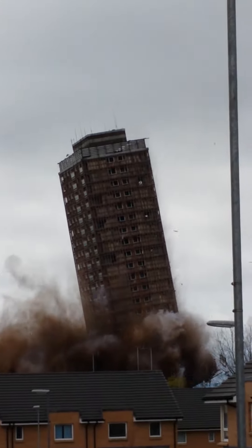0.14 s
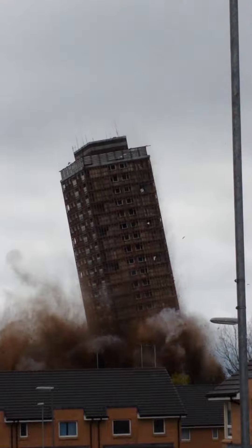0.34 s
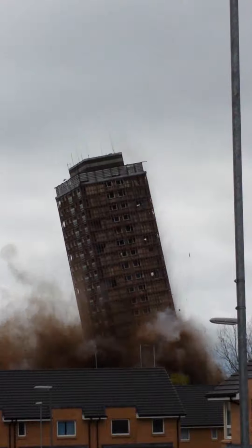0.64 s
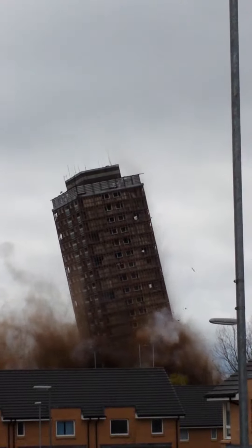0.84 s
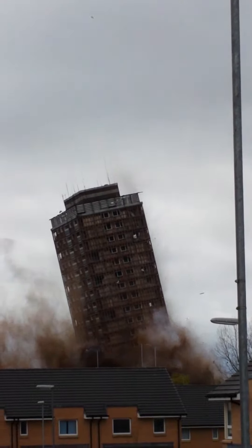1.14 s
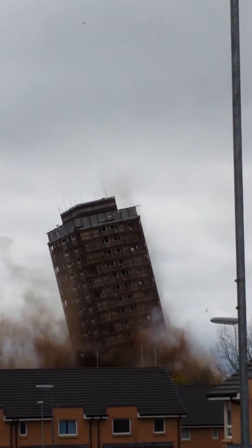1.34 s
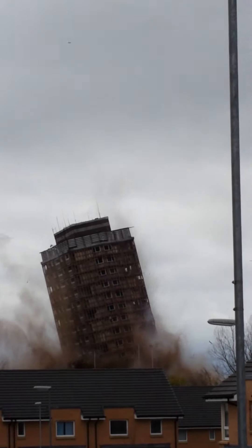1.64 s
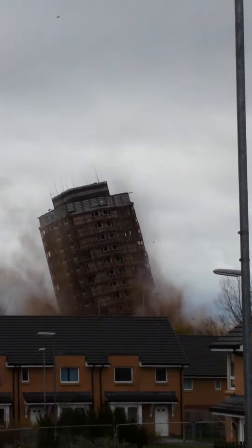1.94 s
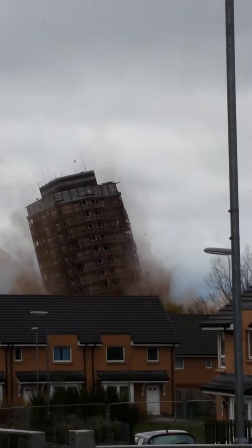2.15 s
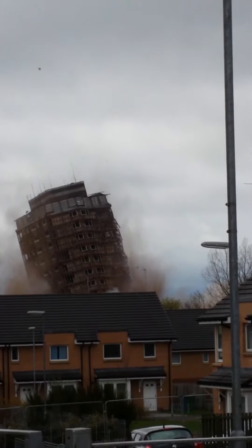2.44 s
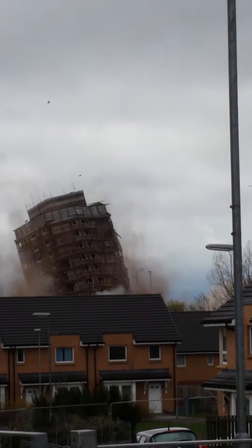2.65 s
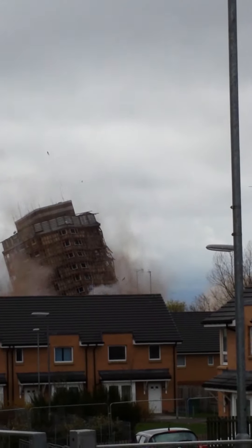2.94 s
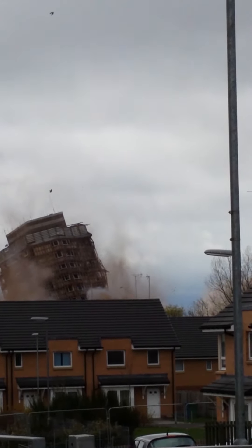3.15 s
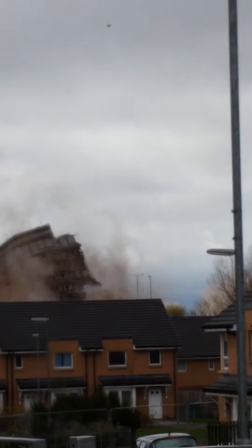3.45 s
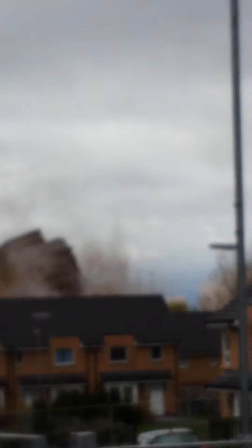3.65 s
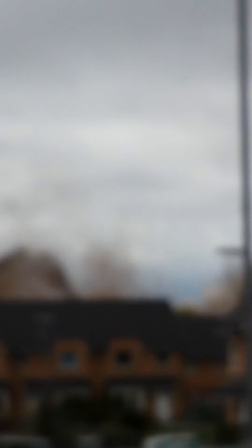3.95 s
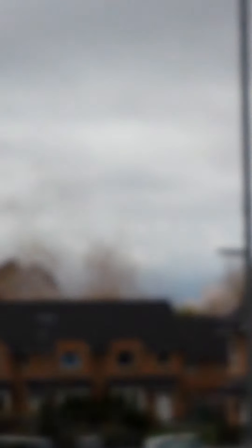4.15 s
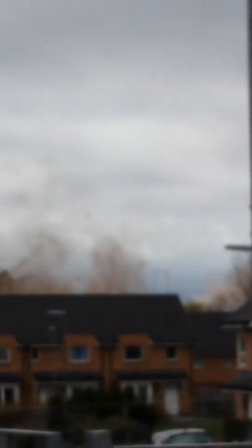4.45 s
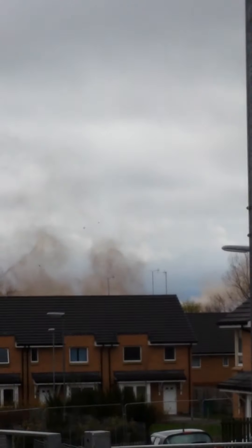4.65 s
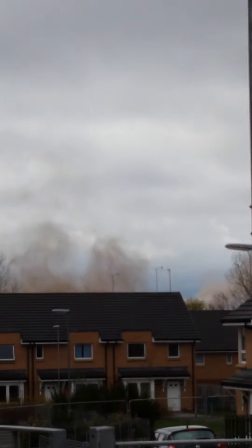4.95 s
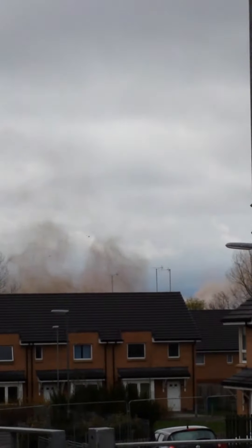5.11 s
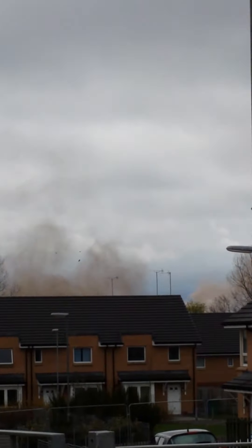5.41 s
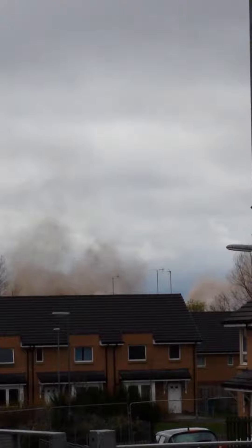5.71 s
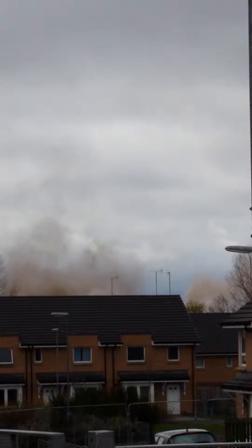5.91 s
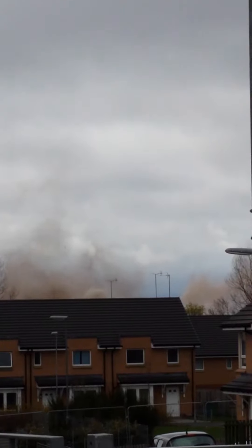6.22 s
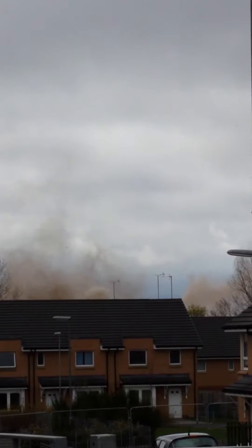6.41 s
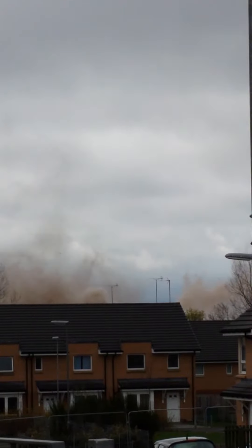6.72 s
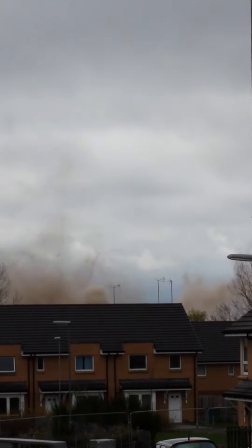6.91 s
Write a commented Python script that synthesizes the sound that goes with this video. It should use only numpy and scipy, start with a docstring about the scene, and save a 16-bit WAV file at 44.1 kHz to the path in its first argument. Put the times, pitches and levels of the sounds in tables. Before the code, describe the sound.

Continuous rough roar of rubble over deep low booming, packed with thuds, brick and slab slams and sharp snaps. Strongest in the first few seconds, it drops after about four seconds, rises in a second wave near six, and fades. Heard at a distance in a residential street through a small stereo device, slightly muffled at the very top.

```python
"""The ground shudders and floors boom onto each other: a tower block comes down a few streets away,
heard outdoors between houses. Masonry roars onto the heap and concrete shatters in a dense crackle.
The roar sinks once the tower is down, surges again as the last of it lands, and fades.
Continuous layers are hails of random clicks shaped by a spectrum; single blows are swells of band noise."""
import sys
import numpy as np
from scipy import signal
from scipy.fft import rfft, irfft, next_fast_len
from scipy.io import wavfile
from scipy.ndimage import uniform_filter1d

SR = 44100
rng = np.random.default_rng(int(sys.argv[2]) if len(sys.argv) > 2 else 0)


def wav_record(signal):
    """Record a signal, one row per channel, as 16-bit PCM in the file named by sys.argv[1]."""
    frames = np.transpose(np.atleast_2d(signal))
    bounded = np.clip(frames, -1, 1)
    # unit amplitude maps onto the largest positive 16-bit level
    quanta = np.round(bounded * 32767).astype(np.int16)
    wavfile.write(sys.argv[1], SR, quanta)


N = 311909
TIME = np.arange(N) / SR
PADDED = next_fast_len(N + SR // 2)
HZ = np.maximum(np.arange(PADDED // 2 + 1) * SR / PADDED, 1)

# Levels are relative within a layer; each layer function trims them.
# ground shaking: (time [s], level [dB])
SHAKE_LEVEL = [(0.0, -21.5), (0.18, -36), (0.4, -26), (1.7, -39.5), (2.8, -35), (3.7, -48), (4.8, -45.5),
               (6.45, -35), (7.07, -48)]
# heavy sections jolting the ground: (time [s], peak [dB], pitch [Hz], t60 [s])
GROUND_JOLTS = [(0.075, -18.5, 52.3, 0.31), (0.22, -20, 51.7, 0.46), (0.3, -19.5, 49.2, 0.3),
                (0.525, -24, 54, 0.43), (0.655, -26, 54, 0.18), (0.855, -16.5, 54.5, 0.36),
                (1.324, -19, 58.8, 0.32), (3.948, -26, 56.7, 0.41), (4.2, -28, 54.8, 0.54),
                (5.306, -40, 55, .3), (6.31, -25, 52, 0.25)]
# floors crushing each other: (time [s], level [dB])
MASS_LEVEL = [(0.0, -25.5), (0.2, -21), (0.36, -21), (0.5, -17), (0.75, -21), (1.2, -18), (1.9, -19.5),
              (2.5, -21), (3.4, -22), (4.1, -27.5), (5.7, -25), (6.55, -26.5), (7.07, -37.5)]
# whole floors landing: (time [s], peak [dB], pitch [Hz], t60 [s])
FLOOR_THUDS = [(0.1, -12.5, 185, 0.14), (0.125, -12, 112, 0.13), (0.188, -10, 117, 0.17),
               (0.243, -16, 118, 0.21), (0.287, -12.5, 95, 0.26), (0.378, -14, 212, 0.32),
               (0.425, -12.5, 181, 0.23), (0.535, -19.5, 111, 0.56), (0.64, -13.5, 205, 0.17),
               (0.79, -14.5, 210, 0.49), (0.87, -14.5, 109, 0.36), (0.945, -11, 180, 0.44),
               (1.69, -12.5, 179, 0.36), (1.781, -8.5, 181, 0.11), (1.849, -8.5, 184, 0.35),
               (1.92, -10.5, 176, 0.35), (2.125, -11.5, 228, 0.37), (2.15, -14.5, 103, 0.57),
               (2.231, -13, 186, 0.24), (2.594, -12.5, 252, 0.14), (2.85, -15, 177, 0.41),
               (3.609, -8, 169, 0.095), (3.819, -15, 178, 0.12), (4.63, -19.5, 200, 0.17),
               (4.876, -17, 210, 0.14), (5.077, -19, 215, 0.17), (5.155, -16.5, 204, 0.4),
               (5.452, -14, 196, 0.59), (5.59, -21, 141, 0.25), (5.757, -14.5, 208, 0.37),
               (6.42, -26, 103, 0.73)]
# debris flowing onto the heap: (time [s], tumbling masonry [dB], shattering concrete [dB])
DEBRIS_LEVELS = [(0.0, -29, -28), (0.16, -24.5, -27), (0.28, -23, -22.5), (0.78, -19.5, -23),
                 (1.05, -18.5, -19), (1.36, -17, -21.0), (1.48, -19.5, -21), (1.78, -18.5, -21),
                 (2.15, -18, -21.5), (2.4, -20.5, -22.5), (2.93, -21.5, -23), (3.28, -20, -19.5),
                 (3.41, -21.5, -21.5), (3.5, -22.5, -22), (3.65, -23.5, -23.5), (4.05, -25, -25.5),
                 (4.45, -29.5, -28), (5.0, -27.5, -27.5), (5.3, -26, -24.5), (5.55, -21.5, -22.5),
                 (5.83, -20, -20.5), (6.24, -22.5, -25), (6.32, -19, -22.5), (6.61, -22.5, -24.5),
                 (6.68, -25, -27.5), (6.79, -27, -29.5), (6.85, -25.5, -27.5), (7.07, -30, -30.5)]
# ends of the masonry's roar: (time [s], heavy blocks [dB], small fragments [dB])
MASONRY_SIZES = [(0.0, 5, 5.5), (0.8, -1, -4), (1.3, -5.5, -2), (1.5, 2, 0.5), (1.7, -2, 2.5),
                 (2.3, -3.5, 4), (2.7, 1, 2.5), (3.2, -2.5, -1.5), (4.0, -1, 4), (4.7, 4, 5), (5.8, 0, 0),
                 (6.3, -1.5, -1), (6.7, 2, -3.5), (7.07, -1.5, 3.5)]
# slabs and bricks slamming onto rubble: (time [s], peak [dB], pitch [Hz], t60 [s])
SLAB_SLAMS = [(0.234, -16, 595, 0.45), (0.41, -17.5, 510, 0.42), (0.45, -15, 643, 0.35),
              (0.828, -16, 850, 0.23), (0.92, -17, 930, 0.16), (1.055, -12, 650, 0.33),
              (1.135, -13.5, 866, 0.13), (1.185, -13.5, 892, 0.19), (1.243, -10.5, 877, 0.26),
              (1.395, -14.5, 870, 0.079), (1.52, -10, 887, 0.18), (1.57, -12.5, 930, .2),
              (1.655, -12, 844, 0.11), (1.87, -15, 933, 0.24), (2.0, -19.5, 1450, 0.37),
              (2.19, -30, 1330, 0.24), (2.315, -15.5, 1310, 0.25), (2.45, -17, 1230, 0.1),
              (2.514, -13, 894, 0.12), (2.625, -14, 1350, 0.16), (2.73, -18, 337, 0.28),
              (2.849, -20, 980, 0.13), (2.997, -10.5, 920, 0.15), (3.095, -15, 1294, 0.44),
              (3.444, -17, 774, 0.07), (3.976, -19, 980, 0.22), (4.255, -21, 896, 0.073),
              (4.292, -16.5, 844, 0.1), (4.59, -20.5, 870, 0.2), (4.741, -17.5, 994, 0.09),
              (5.032, -18.5, 1210, 0.099), (5.151, -16, 910, 0.28), (5.227, -14, 680, 0.054),
              (5.35, -13.5, 995, 0.086), (5.535, -24, 467, 0.2), (5.675, -20, 442, 0.55),
              (5.727, -10.5, 750, .09), (5.795, -13, 820, 0.23), (5.832, -13.5, 487, 0.25),
              (5.85, -14, 900, 0.07), (5.905, -14.5, 870, 0.16), (5.97, -16.5, 834, 0.12),
              (6.458, -17.5, 680, 0.098), (6.58, -13, 725, 0.12), (6.625, -20, 500, 0.1),
              (6.838, -20.5, 825, 0.093), (6.874, -18, 820, 0.09)]
# beams and panels snapping: (time [s], peak [dB], pitch [Hz], t60 [s])
BEAM_CRACKS = [(0.3305, -12.5, 3170, 0.078), (0.47, -19, 4390, .08), (1.008, -15, 2900, .08),
               (1.131, -11.5, 4630, 0.083), (1.152, -13, 4000, 0.064), (1.5279, -15, 4960, 0.078),
               (1.556, -12, 3420, 0.086), (1.968, -17, 3500, .14), (2.063, -13, 3300, 0.082),
               (2.618, -12, 3700, 0.07), (2.634, -11, 3480, 0.13), (3.116, -14, 3100, .06),
               (3.268, -15, 3900, 0.11), (3.357, -13.5, 4300, 0.065), (3.453, -14, 3280, 0.11),
               (3.494, -13.5, 3500, 0.077), (3.57, -14.5, 3670, 0.089), (3.826, -23, 3400, .05),
               (5.224, -14.5, 2971, 0.11), (5.324, -19, 3300, .07), (5.644, -13.5, 3496, 0.086),
               (6.311, -18, 3500, 0.065), (6.374, -13.5, 3160, 0.088), (6.468, -15, 3391, 0.071),
               (6.576, -16, 3650, 0.19), (6.718, -21, 3170, 0.098), (6.9, -25, 3300, .08)]
# hard pieces clacking together: (time [s], peak [dB], pitch [Hz], t60 [s])
HARD_CLACKS = [(0.972, -10.5, 1950, .03), (1.015, -16, 1990, 0.054), (1.157, -18, 1900, 0.028),
               (1.236, -18, 1970, 0.048), (1.3448, -18, 2000, 0.051)]
# one thin squeak: (start [s], length [s], level [dB], base pitch [Hz])
SQUEAK_EVENT = (1.012, 0.082, -26, 2768)

# spectrum of the shaking ground: (frequency [Hz], gain [dB])
GROUND_SPECTRUM = [(6, -44), (12, -11.5), (21, -23), (27, -16), (37, -4.5), (54, 0), (68, 1), (85, -37)]
# spectrum of the crushing floors: (frequency [Hz], gain [dB])
BOOM_SPECTRUM = [(58, -37), (76, -13.5), (96, -4), (120, -4.5), (159, -8), (175, 4), (197, -1.5), (220, -6),
                 (250, -5), (275, -11.5), (335, -15), (400, -23)]
# spectrum of tumbling masonry: (frequency [Hz], gain [dB])
MASONRY_SPECTRUM = [(240, -45), (310, -6.5), (350, -5.5), (450, -5), (540, -3), (585, -4), (630, -0.3),
                    (695, -4.5), (745, 0.8), (825, -3), (945, 1.1), (1100, -4), (1220, -7.5), (1300, -4.5),
                    (1520, -7.5), (1800, -25.5)]
# spectrum of shattering concrete: (frequency [Hz], gain [dB])
SHATTER_SPECTRUM = [(1380, -8), (1620, -2.5), (1950, 1.5), (2300, -1), (2550, 0.4), (2790, -2.5),
                    (3100, -0.5), (4300, -6), (5100, -10.5), (5380, -11.5), (6000, -12.5), (6800, -21.5),
                    (8000, -32.5), (9000, -51.5)]

# two microphone ports: (frequency [Hz], left minus right [dB], left lead [rad], likeness [0-1])
PORT_RESPONSE = [(60, 0.5, -0.1, 0.986), (200, -0.7, -0.07, 0.993), (700, -1.6, -0.24, 0.98),
                 (1100, -0.0, -0.2, 0.94), (1350, -9.2, -0.59, 0.83), (1480, -5.4, -0.25, 0.92),
                 (1660, -11.1, 0.97, 0.51), (1900, -0.8, 1.01, 0.91), (2500, 3.5, 0.42, 0.83),
                 (3400, 4.9, 0.05, 0.78), (4600, 8.4, -0.77, 0.62), (6100, 12.1, -1.68, 0.39),
                 (7100, 4.8, -3.07, 0.34), (8200, -12.8, -3.79, 0.11)]
# echoes from nearby walls: (delay [ms], level [dB])
WALL_ECHOES = [(7.67, -20), (8.49, -22), (9.36, -20)]
# reflections from right beside the left port: (delay [ms], level [dB])
LEFT_PORT_ECHOES = [(1.59, -21), (2.0, -25)]
WALL_DULL_HZ = 2500  # wall echoes lose treble above this
NEAR_FROM_HZ = 900  # left-port reflections lose bass below this
CUTOFF_HZ = 8500

# when the top reaches the heap; the boom loses its depth over LAST_FLOORS_S before that
TOWER_DOWN_S, LAST_FLOORS_S = 4.3, 1.2
DEEP_TALL_DB, DEEP_DOWN_DB = -1, -6.3  # deepest part of the boom: tower tall, tower down
HOLLOW_HZ, HOLLOW_HALF_WIDTH_HZ, HOLLOW_DB = 477, 76, -2.5  # dip in the roar while the tower is tall
GRIT_PER_DB = 0.03  # extra dB of fine grit per dB of shattering
GRIT_FROM_S, GRIT_UNTIL_S, GRIT_FADE_DB_PER_S = 0.29, 6.73, 15  # grit fades outside this span
# sprays of chips from single breaks
SPRAYS_PER_S, SPRAY_RISE_S, SPRAY_DECAY_S, SPRAY_SWING_DB = 90, 0.002, 0.007, 0.5
# small heaps of bricks toppling: they stand out more as the flow thins
TOPPLES_PER_S, TOPPLE_RISE_S, TOPPLE_DECAY_S = 40, 0.004, 0.015
TOPPLE_SWING_DB, TOPPLE_DB_PER_DB = 0.25, 0.06


def from_db(db):
    """Decibels to gain."""
    return 10 ** (np.asarray(db) / 20)


def rms_one(x):
    """Scale to unit power."""
    return x / np.sqrt(np.mean(x ** 2) + 1e-20)


def in_time(rows):
    """One value per sample for each column of a curve."""
    time_s, *columns = np.transpose(rows)
    return [np.interp(TIME, time_s, column) for column in columns]


def in_frequency(rows):
    """One value per frequency bin for each column, interpolated over log frequency."""
    hz, *columns = np.transpose(rows)
    return [np.interp(np.log(HZ), np.log(hz), column) for column in columns]


def filtered(x, response):
    """Apply a frequency response."""
    return irfft(rfft(x, PADDED) * response, PADDED)[..., :N]


def butter(x, hz, kind, order=2):
    """Causal low-, high- or band-pass."""
    sos = signal.butter(order, np.clip(hz, 10, .45 * SR), kind, fs=SR, output="sos")
    return signal.sosfilt(sos, x)


def drift(corner_hz):
    """Smooth random wander, rms 1: white noise low-passed at corner_hz."""
    return rms_one(filtered(rng.standard_normal(N), 1 / (1 + (HZ / corner_hz) ** 2)))


def flurries(per_s, rise_s, decay_s):
    """Random little surges of uneven size, each rising quickly and dying away; mean 0, spread 1."""
    starts = (rng.random(N) < per_s / SR) * rng.uniform(.3, 1, N)
    rise = 1 + 2j * np.pi * HZ * rise_s
    decay = 1 + 2j * np.pi * HZ * decay_s
    surges = filtered(starts, 1 / (rise * decay))
    return rms_one(surges - surges.mean())


def impacts(spectrum, per_s, spread_db):
    """A hail of random-sign clicks, sized by chance and shaped by one spectrum; rms 1."""
    sizes = from_db(spread_db * np.minimum(rng.exponential(1, N), 4))
    chance = np.maximum(per_s, 1) / SR
    hits = rng.random(N) < chance
    signs = rng.choice([-1, 1], N)
    clicks = hits * sizes * signs / np.sqrt(np.minimum(chance, 1))  # power independent of rate
    gain_db, = in_frequency(spectrum)
    inside = (HZ > spectrum[0][0]) & (HZ < spectrum[-1][0])
    return rms_one(filtered(clicks, from_db(gain_db) * inside))


def evened(x, span_s):
    """So many pieces fall at once that their summed power holds steady over a short span."""
    power = uniform_filter1d(x ** 2, max(int(span_s * SR), 1), mode="reflect")
    return x / np.sqrt(np.maximum(power, 1e-6))


def sorted_by_size(x, split_hz, lows_db, highs_db):
    """Shift the weight between large, low pieces and small, high ones."""
    lows = filtered(x, 1 / (1 + (HZ / split_hz) ** 8))
    return lows * from_db(lows_db) + (x - lows) * from_db(highs_db)


def bursts(rows, width, rise_s):
    """Each blow is a quick, solid swell of crushing noise around its own pitch that dies away."""
    out, t = np.zeros(N + SR), TIME[:SR // 2]
    noises = rng.standard_normal((len(rows), len(t)))
    for (start_s, peak_db, hz, t60_s), noise in zip(rows, noises):
        low_hz, high_hz = hz / (1 + width), hz * (1 + width)
        band = butter(noise, [low_hz, high_hz], "band")
        crush = evened(band, span_s=1 / (high_hz - low_hz))
        swell = (1 - np.exp(-t / rise_s)) * from_db(-60 * t / t60_s)
        blow = butter(crush * swell, [low_hz, high_hz], "band")
        start = max(round(start_s * SR), 0)
        out[start:start + len(t)] += from_db(peak_db) * blow / np.abs(blow).max()
    return out[:N]


def standing():
    """1 while the tower is tall, sinking to 0 as its top reaches the heap."""
    return np.clip((TOWER_DOWN_S - TIME) / LAST_FLOORS_S, 0, 1)


def hollowed(x):
    """The low mids are hollow at first and fill in as the tower goes down."""
    dip = filtered(x, 1 / (1 + ((HZ - HOLLOW_HZ) / HOLLOW_HALF_WIDTH_HZ) ** 4))
    return x + dip * (from_db(HOLLOW_DB * standing()) - 1)


def ground():
    """The ground shudders as low, dense impacts, with a jolt for each heavy section that lands."""
    level_db, = in_time(SHAKE_LEVEL)
    shudder = evened(impacts(GROUND_SPECTRUM, per_s=2300, spread_db=-2.5), span_s=0.21)
    jolts = bursts(GROUND_JOLTS, width=0.23, rise_s=0.014)
    return from_db(level_db - 1.0) * shudder + from_db(-7.0) * jolts


def squeak():
    """A brief sine squeak, roughened in pitch and level, that arches a little in pitch."""
    start_s, length_s, level_db, base_hz = SQUEAK_EVENT
    arch = np.sin(np.pi * np.clip((TIME - start_s) / length_s, 0, 1))
    pitch_hz = base_hz + 16 * arch + 12 * drift(120)
    envelope = from_db(level_db + 2 * drift(60)) * np.sqrt(np.abs(arch))
    return envelope * np.sin(2 * np.pi * np.cumsum(pitch_hz) / SR)


def shattering():
    """Concrete breaks into a crackle of chips, grittier when louder, with single snaps and clacks."""
    _, level_db = in_time(DEBRIS_LEVELS)
    chips_per_s = 20000 * from_db(level_db - level_db.max())
    chips = impacts(SHATTER_SPECTRUM, per_s=chips_per_s, spread_db=2.5)
    outside_s = np.abs(TIME - np.clip(TIME, GRIT_FROM_S, GRIT_UNTIL_S))
    grit_db = GRIT_PER_DB * (level_db - level_db.mean()) - GRIT_FADE_DB_PER_S * outside_s
    spurts_db = 0.8 * drift(26)  # fine grit comes in little spurts
    chips = sorted_by_size(chips, split_hz=3900, lows_db=-2.5, highs_db=grit_db + spurts_db)
    cracks = butter(bursts(BEAM_CRACKS, width=0.51, rise_s=0.00091), 6700, "low", order=8)
    clacks = bursts(HARD_CLACKS, width=0.1, rise_s=0.00092)
    sprays_db = SPRAY_SWING_DB * flurries(SPRAYS_PER_S, SPRAY_RISE_S, SPRAY_DECAY_S)
    crackle = from_db(level_db + sprays_db - 3.5) * evened(chips, span_s=0.19)
    return crackle + from_db(-5.5) * cracks + from_db(-3.0) * clacks


def masonry():
    """Blocks and bricks roar, thicker when louder and shifting in size; slabs slam through it."""
    level_db, _ = in_time(DEBRIS_LEVELS)
    heavy_db, small_db = in_time(MASONRY_SIZES)
    blocks_per_s = 8000 * from_db(level_db - level_db.max())
    roar = evened(impacts(MASONRY_SPECTRUM, per_s=blocks_per_s, spread_db=0.9), span_s=0.06)
    roar = sorted_by_size(roar, split_hz=570, lows_db=heavy_db, highs_db=-1.5)
    roar = sorted_by_size(roar, split_hz=1400, lows_db=0.5, highs_db=small_db)
    slams = bursts(SLAB_SLAMS, width=0.36, rise_s=0.0069)
    swing_db = TOPPLE_SWING_DB + TOPPLE_DB_PER_DB * (level_db.max() - level_db)
    topples_db = swing_db * flurries(TOPPLES_PER_S, TOPPLE_RISE_S, TOPPLE_DECAY_S)
    return from_db(level_db + topples_db - 2.0) * hollowed(roar) + from_db(-3.5) * slams


def falling_mass():
    """The stacked floors boom, deepest while the tower is tall, with single heavy thuds."""
    level_db, = in_time(MASS_LEVEL)
    deep_db = DEEP_DOWN_DB + (DEEP_TALL_DB - DEEP_DOWN_DB) * standing()
    boom = impacts(BOOM_SPECTRUM, per_s=4000, spread_db=0.0)
    boom = sorted_by_size(boom, split_hz=145, lows_db=deep_db, highs_db=-0.5)
    thuds = bursts(FLOOR_THUDS, width=0.3, rise_s=0.008)
    return from_db(level_db - 3.0) * evened(boom, span_s=0.071) + from_db(-4.0) * thuds


def collapse():
    """The ground and all sizes of debris together."""
    return ground() + shattering() + masonry() + falling_mass()


def echo_response(rows):
    """Frequency response of a sum of delayed copies."""
    return sum(from_db(db) * np.exp(-2j * np.pi * HZ * ms / 1000) for ms, db in rows)


def off_walls(x):
    """Walls add short, dull echoes that ripple the roar; a close surface reflects treble at the left."""
    walls = echo_response(WALL_ECHOES) / (1 + (HZ / WALL_DULL_HZ) ** 2)
    near = echo_response(LEFT_PORT_ECHOES) / (1 + (NEAR_FROM_HZ / HZ) ** 2)
    both = 1 + walls
    return filtered(x, np.array([both + near, both]))


def scene():
    """Both ports share the direct sound; what the houses scatter is unrelated in its fine detail."""
    balance_db, lead_rad, alike = in_frequency(PORT_RESPONSE)
    sides = np.array([[1], [-1]])  # left, right
    ports = from_db(sides * balance_db / 2) * np.exp(.5j * sides * lead_rad)
    direct = ports * np.sqrt(1 + alike)
    scattered = ports * np.sqrt(1 - alike) * sides
    # keeps the sum of the ports flat
    centre = np.hypot(np.abs(direct.mean(axis=0)), np.abs(scattered.mean(axis=0)))
    direct_sound = filtered(collapse() + squeak(), direct / centre)
    scattered_sound = filtered(collapse(), scattered / centre)  # fresh random draws
    return off_walls(direct_sound + scattered_sound)


def record(dry):
    """A steep elliptic low-pass cuts off the top."""
    return signal.sosfilt(signal.ellip(10, .1, 90, CUTOFF_HZ, fs=SR, output="sos"), dry)


dry = scene()
out = record(dry)
wav_record(out)
```